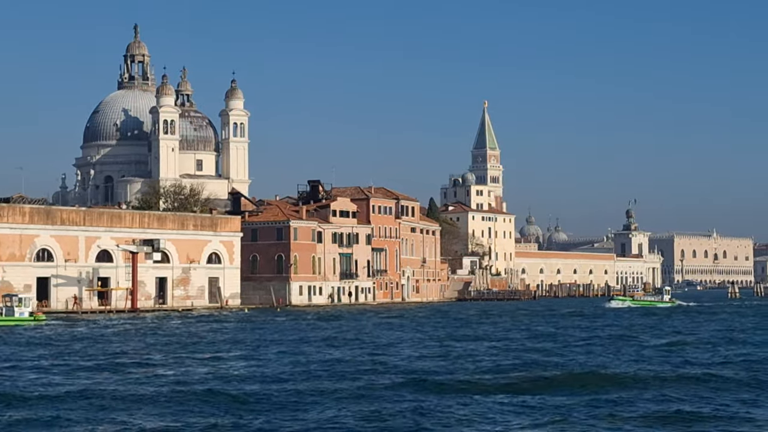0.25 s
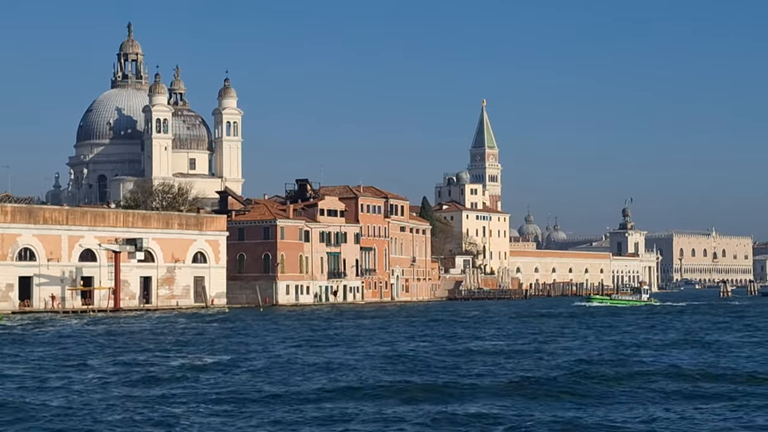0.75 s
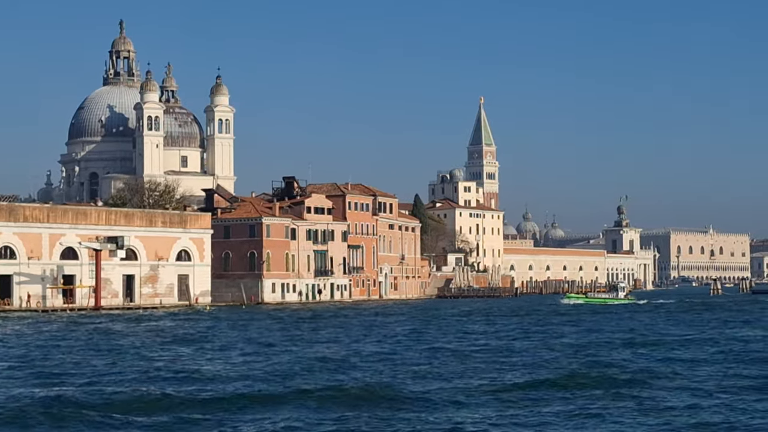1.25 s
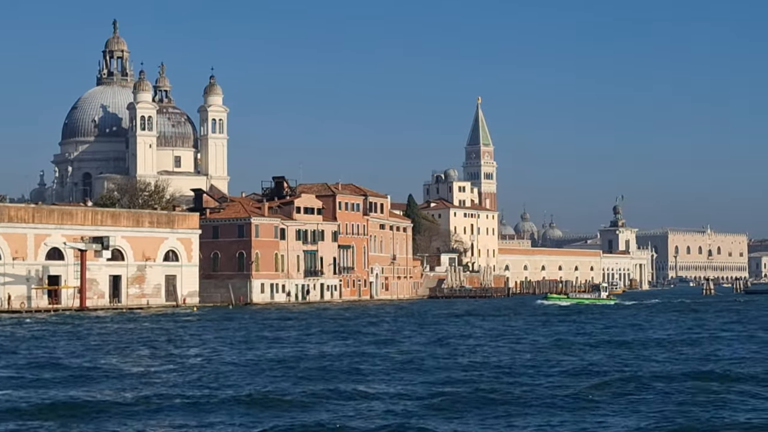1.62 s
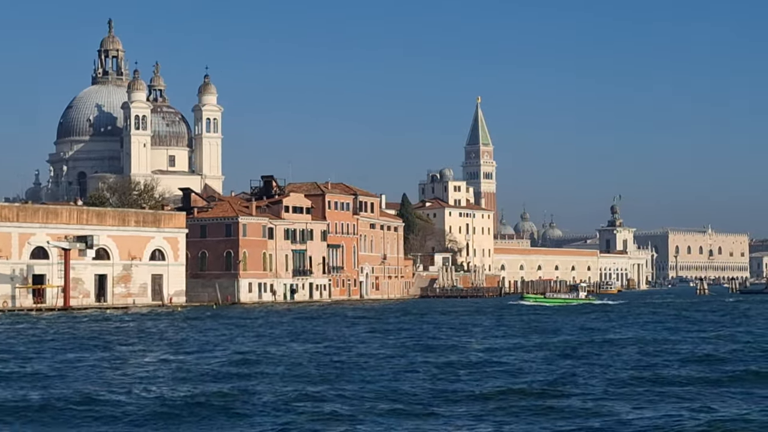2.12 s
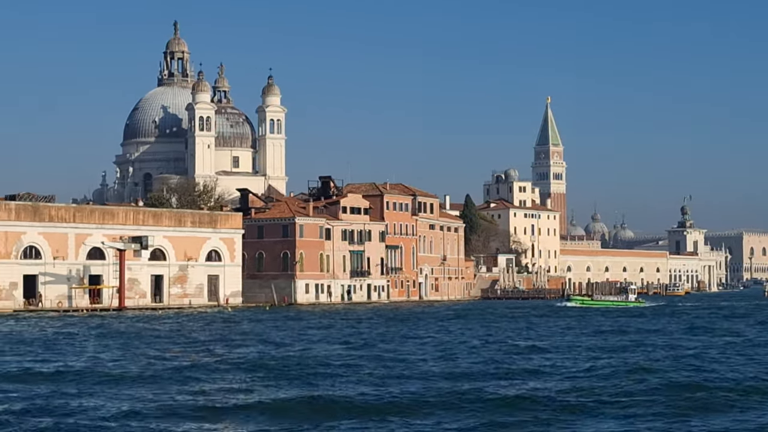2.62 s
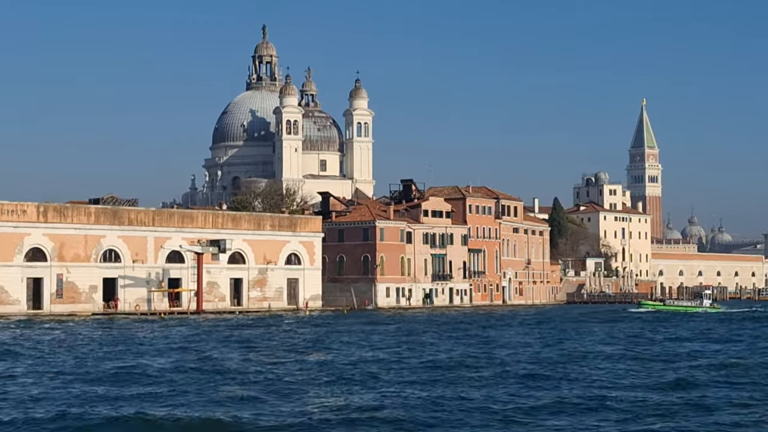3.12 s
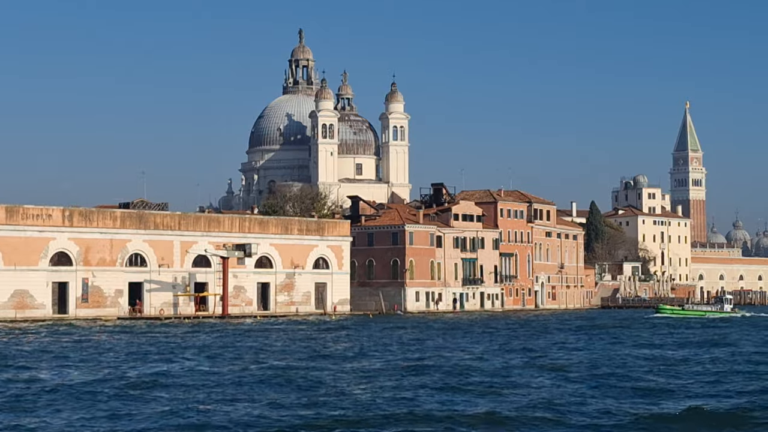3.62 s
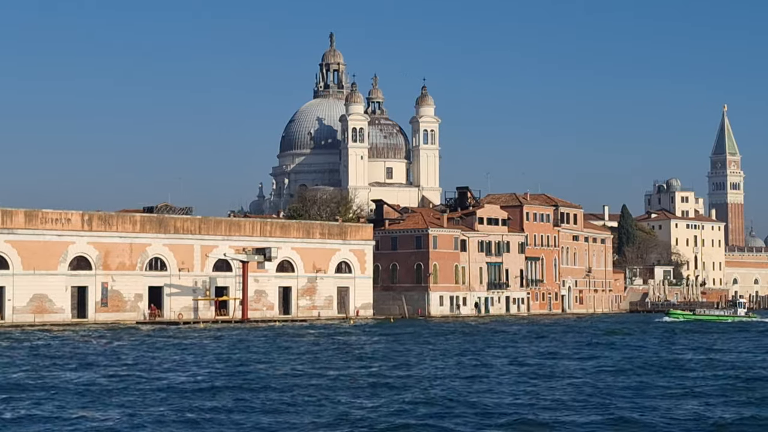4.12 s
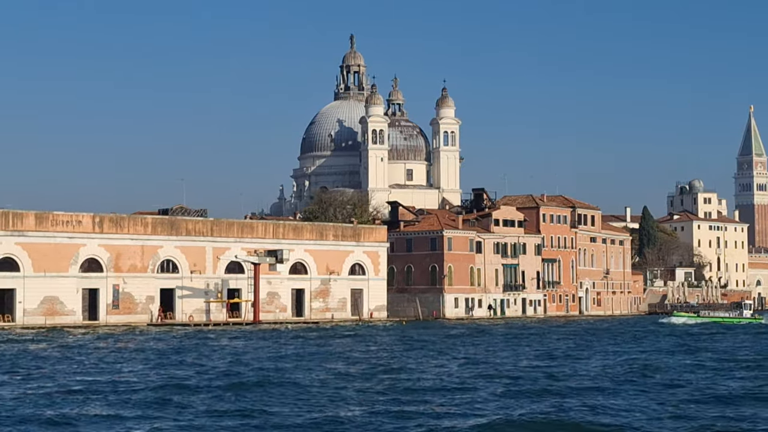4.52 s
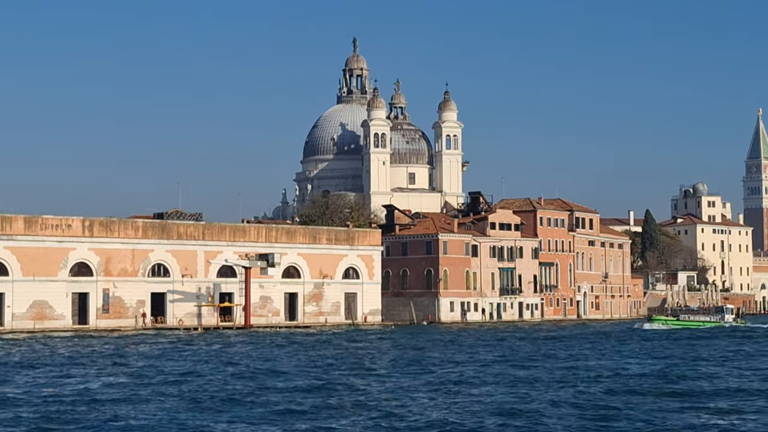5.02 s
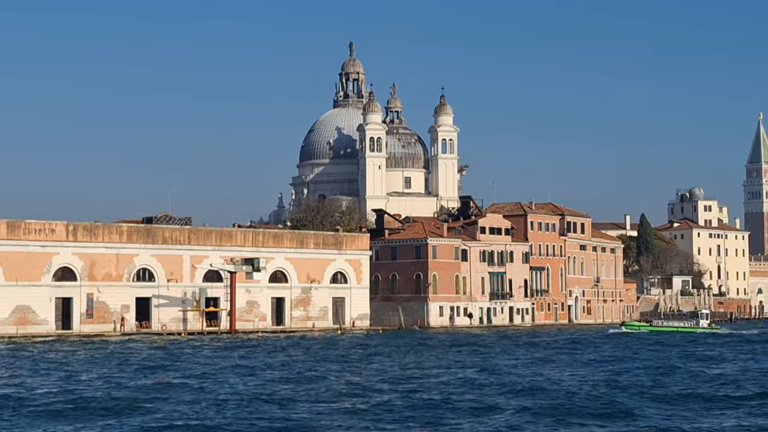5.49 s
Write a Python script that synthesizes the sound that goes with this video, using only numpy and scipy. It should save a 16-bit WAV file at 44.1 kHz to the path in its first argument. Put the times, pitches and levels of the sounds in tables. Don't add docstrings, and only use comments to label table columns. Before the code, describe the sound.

A steady, bass-heavy boat engine drone runs from start to finish, throbbing rapidly because two diesels turn at nearly the same speed. The near one dominates, with dull, quick, uneven raps in its casing. Low propeller hum and water rumble lie below, thin hissing wash above. The level sways gently as the hull moves, with knocks and rumble sinking later. Close stereo pickup outdoors on deck, slightly left-weighted, without room echo.

```python
import sys
import numpy as np
from scipy import signal
from scipy.fft import rfft, irfft, next_fast_len
from scipy.io import wavfile

SR = 44100
rng = np.random.default_rng(int(sys.argv[2]) if len(sys.argv) > 2 else 0)


def attenuation_scalar(level_db):
    decades = np.asarray(level_db, float) / 20
    return 10 ** decades


def generate_wav(sig):
    pcm = np.round(np.clip(np.atleast_2d(sig).T, -1, 1) * 32767).astype(np.int16)
    wavfile.write(sys.argv[1], SR, pcm)


N = 253575
TIME_S = np.arange(N) / SR
RIGHT_LAG = 11


def rms_one(x):
    return x / np.sqrt(np.mean(x ** 2) + 1e-20)


def at_hz(points, hz):
    point_hz, value = np.transpose(points)
    return np.interp(np.log(hz), np.log(point_hz), value)


def drift(rate_hz):
    coarse = 40
    r = np.exp(-2 * np.pi * coarse * rate_hz / SR)
    noise = rng.standard_normal(N // coarse + 2002)
    slow = signal.lfilter([1], [1, -2 * r, r * r], noise)[2000:]
    return np.interp(np.arange(N) / coarse, np.arange(len(slow)), rms_one(slow))


def resonance(x, hz, width_hz):
    r = np.exp(-np.pi * width_hz / SR)
    side = (1 - r * r) / 2
    return signal.lfilter([side, 0, -side], [1, -2 * r * np.cos(2 * np.pi * hz / SR), r * r], x)


def from_left(x, pan_db, lag=RIGHT_LAG):
    late = np.r_[x[:lag][::-1], x[:N - lag]]
    return np.array([x, late]) * attenuation_scalar([[pan_db / 2], [-pan_db / 2]])


def lulls(rows):
    s, length, *columns = np.transpose(rows)
    coarse_s = np.arange(0, N + 200, 200) / SR
    bells = np.exp(-4 * ((coarse_s[:, None] - s) / length) ** 2)
    return [np.interp(TIME_S, coarse_s, bells @ c) for c in columns]


def exhaust(cycles, orders, timing, firing_db, others_db, hull_db, flutter_db):
    bank_lag = .17
    lead, lag = timing
    out = np.zeros(N)
    for order, level_db in orders:
        if order % 3 == 0:
            turns = order * lead - lag - bank_lag * (order % 6 == 3)
        else:
            turns = rng.random()
        if order == 6:
            swell_db = firing_db
        elif order < 20:
            swell_db = others_db
        else:
            swell_db = hull_db - hull_db.mean()
        flutter = flutter_db * np.log2(max(order, 6) / 4) * drift(7.7)
        out += attenuation_scalar(level_db + swell_db + flutter) * np.cos(2 * np.pi * (order * cycles + turns))
    return np.sqrt(2) * out


def propellers(blade_hz):
    out = np.zeros(N)
    for hz, level_db, start in zip(blade_hz, (-32, -29), (.12, -.31)):
        turns = np.cumsum(hz) / SR + start
        out += attenuation_scalar(level_db + 0.51 * drift(3.9)) * np.cos(2 * np.pi * turns)
    return np.sqrt(2) * out


def knocks(cycles, knock_db):
    # place in the cycle/0-1, knock level/dB
    firings = [
        (.158, -8),
        (.296, -7.5),
        (.483, -9.5),
        (.625, -11),
        (.821, -9),
        (.975, 0),
    ]
    # f/Hz, width/Hz, level/dB
    casing = [
        (710, 440, 0),
        (622, 40, -4),
    ]
    place, strength_db = np.transpose(firings)
    angles = (np.arange(int(cycles[-1]) + 1)[:, None] + place).ravel()
    chance = rng.standard_normal((len(angles), 2))
    wander = cycles + .002 * drift(2)
    at = np.interp(angles + .0008 * chance[:, 0], wander, np.arange(N)).astype(int)
    heard = at < N - 1
    rap_db = np.resize(strength_db, len(at)) + 1.4 * chance[:, 1]
    raps = np.zeros(N)
    raps[at[heard]] = attenuation_scalar(rap_db)[heard]
    body = np.zeros(N)
    for hz, width_hz, level_db in casing:
        ring = raps
        for _ in range(3):
            ring = resonance(ring, hz, width_hz)
        body += attenuation_scalar(level_db) * ring
    body = signal.sosfilt(signal.butter(6, 930, fs=SR, output="sos"), body)
    return attenuation_scalar(knock_db + .4 * (knock_db - knock_db.mean()) - .8) * rms_one(body)


def wash(knock_db, rumble_db, wash_db, patchy_db):
    # f/Hz, density/dB per Hz
    water_spectrum = [(25, -70), (45, -62.5), (80, -51), (170, -58), (400, -65.5), (700, -65.5),
                      (1050, -73.5), (1500, -75), (2000, -78.6), (3800, -84), (6300, -91.2), (7700, -88.4),
                      (8600, -97), (15500, -93.8)]
    # f/Hz, shared part/0-1
    likeness = [(60, .93), (130, .88), (270, .85), (700, .85), (1100, .68), (1600, .72), (2200, .15),
                (15000, .02)]
    # f/Hz, left minus right/dB
    tilt = [(45, 1), (120, 1.9), (300, .2), (600, 2.7), (1000, 0), (1500, 0), (2000, -3.4), (4000, -2.4),
            (6500, 5.2), (7700, 4.6), (8600, .5), (9800, -1.3), (14000, .5)]
    size = next_fast_len(N)
    hz = np.maximum(np.arange(size // 2 + 1) * SR / size, 1)
    common, *apart = rfft(rng.standard_normal((3, size)))
    alike = np.clip(at_hz(likeness, hz), 0, 1)
    arrival = np.exp(-2j * np.pi * hz * np.array([[0], [RIGHT_LAG + 2]]) / SR)
    balance_db = at_hz(tilt, hz) * np.array([[.5], [-.5]])
    colour = attenuation_scalar(at_hz(water_spectrum, hz) + balance_db) * np.sqrt(SR / 2)
    noise = colour * (np.sqrt(alike) * common * arrival + np.sqrt(1 - alike) * np.array(apart))
    together = drift(2)
    band_place = 2 * np.log2(hz / 22)
    out = np.zeros((2, N))
    for k in range(21):
        centre_hz = 22 * 2 ** (k / 2)
        follows = wash_db if centre_hz > 900 else knock_db if centre_hz > 550 else rumble_db
        surge_db = 1.3 * (follows - follows.mean()) * (centre_hz > 240)
        flicker_db = patchy_db * (1.5 if centre_hz < 1800 else .7) * (.4 * together + drift(10))
        band = irfft(noise * np.clip(1 - abs(band_place - k), 0, 1), size)[:, :N]
        out += attenuation_scalar(surge_db + flicker_db) * band
    return out


def scene():
    # multiple of the four-stroke cycle, level/dB rms
    near_orders = [(3, -46), (4, -37.5), (5, -51.5), (6, -14.5), (7, -51), (8, -44), (9, -22), (11, -46.5),
                   (12, -28), (13, -41.5), (14, -46.5), (15, -31), (18, -35.5), (21, -39.5), (24, -50.5),
                   (27, -47.5), (30, -47)]
    far_orders = [(3, -54), (5, -42.5), (6, -19), (7, -48.5), (9, -33), (11, -53), (12, -37), (13, -43),
                  (15, -33.5), (18, -44.5), (21, -47)]
    # t/s, length/s, near firing tone/dB, far firing tone/dB, far other orders/dB
    rolls = [
        (.3, .3, 0, 2, 6.5),
        (.72, 0.32, -1, -4, -3),
        (1.36, 0.59, -2, -10, 1),
        (1.7, 0.44, -0.1, 0.5, 4),
        (2.2, 0.31, -0.5, -1.2, -1),
        (3.2, .4, 0, -4.5, 0.5),
        (4.2, 0.73, -2, -6.5, 2),
        (5.3, .6, -0.5, -2.5, -6),
    ]
    # t/s, length/s, knock/dB, rumble/dB, near engine's other orders/dB
    troughs = [
        (.1, 0.5, -1.5, -0.8, 2.1),
        (.68, 0.49, -4.5, -3, 1.1),
        (.9, 0.34, 1.1, -3, -1.5),
        (1.3, 0.93, -1.5, -0.9, -1.3),
        (2.55, 0.41, 0.4, -3.5, 0.9),
        (3.05, .5, -1, -2, -1),
        (3.9, .4, -5, -6.5, -2.2),
        (4.63, 0.51, -1.5, -8.5, -4),
        (5.14, 0.19, -0.9, -4, -0.2),
    ]
    # t/s, level/dB
    spray = [
        (0.08, -48),
        (0.8, -49.5),
        (2.09, -48.5),
        (3.6, -49),
        (3.8, -48),
        (5.62, -47.5),
    ]

    near_rpm = 1952.33 + np.interp(TIME_S, (4.3, 4.8), [0, 4.8])
    far_rpm = np.full(N, 2047.85)
    near, far = np.cumsum(near_rpm) / 120 / SR, np.cumsum(far_rpm) / 120 / SR
    blade_hz = near_rpm * .034549, far_rpm * .035794

    near_roll, far_roll, far_others = lulls(rolls)
    knock_lull, rumble_lull, near_others = lulls(troughs)
    knock_db, rumble_db = -34 + knock_lull, -37.6 + rumble_lull
    wash_db = np.interp(TIME_S, *np.transpose(spray))

    near_engine = exhaust(near, near_orders, (.097, .63), 1.3 + near_roll, 0.96 + near_others,
                          1.3 * rumble_db, flutter_db=.6)
    far_engine = exhaust(far, far_orders, (-.04, -.01), 0.5 + far_roll, -0.43 + far_others,
                         rumble_db, flutter_db=.7)
    engines = from_left(near_engine, 1.6, lag=4) + from_left(far_engine, .9, lag=1)
    screws = from_left(propellers(blade_hz), 2.3, lag=1)
    casing_knock = from_left(knocks(near, knock_db), 2.2)
    water = wash(knock_db, rumble_db, wash_db, patchy_db=.7)
    return engines + screws + casing_knock + water


def low_pass(x):
    return signal.sosfilt(signal.butter(12, 17080, fs=SR, output="sos"), x)


def record(dry):
    cutoff_hz = 15760
    spectrum = rfft(dry)
    spectrum[:, int(cutoff_hz * N / SR):] = 0
    return low_pass(irfft(spectrum, N))


dry = scene()
out = record(dry)
generate_wav(out)
```